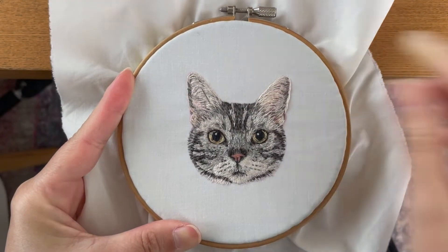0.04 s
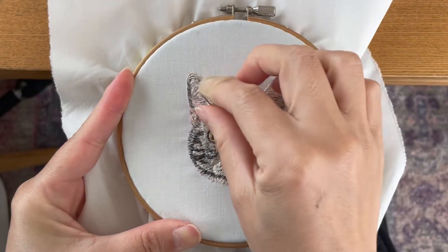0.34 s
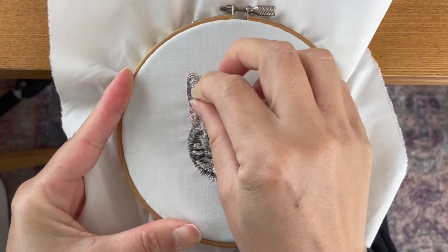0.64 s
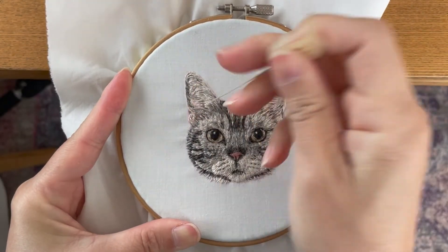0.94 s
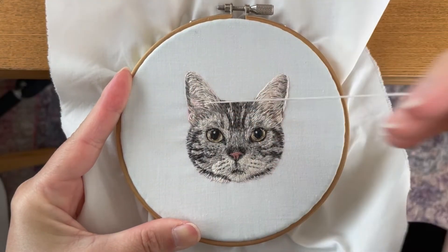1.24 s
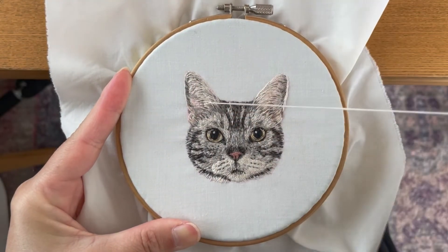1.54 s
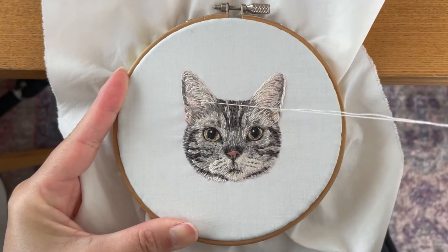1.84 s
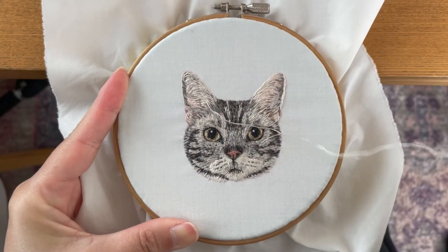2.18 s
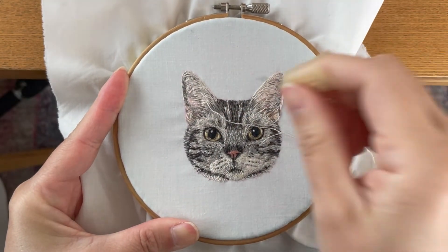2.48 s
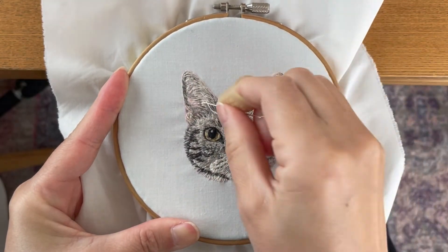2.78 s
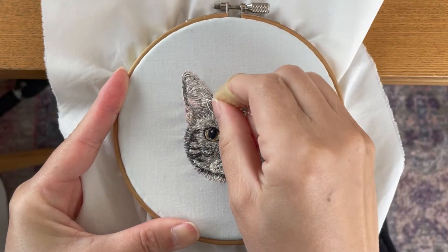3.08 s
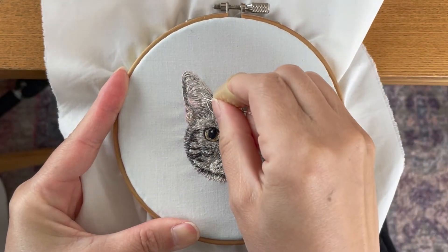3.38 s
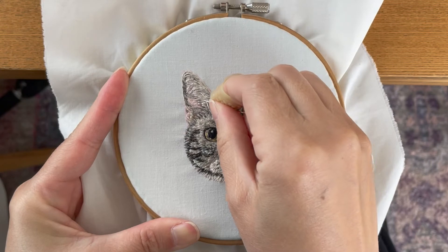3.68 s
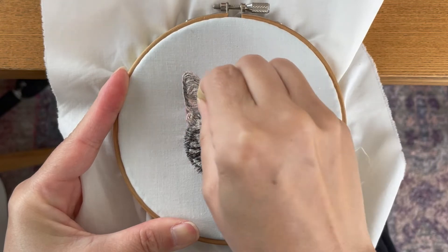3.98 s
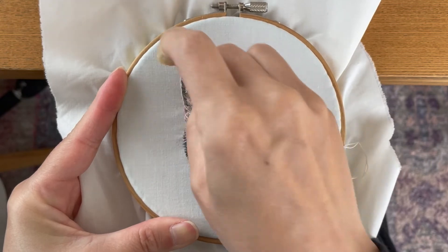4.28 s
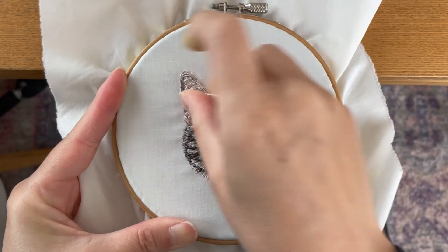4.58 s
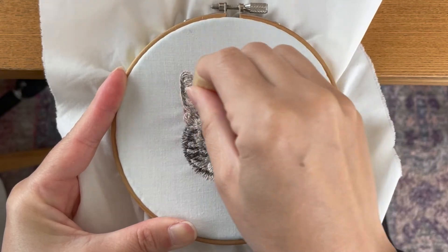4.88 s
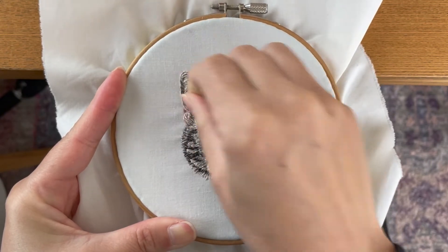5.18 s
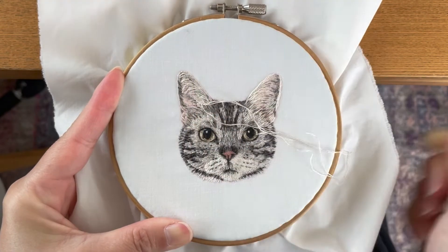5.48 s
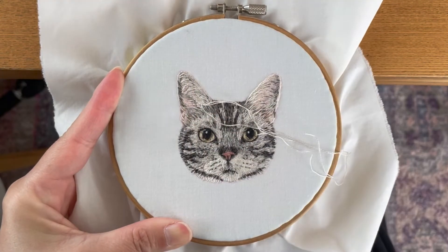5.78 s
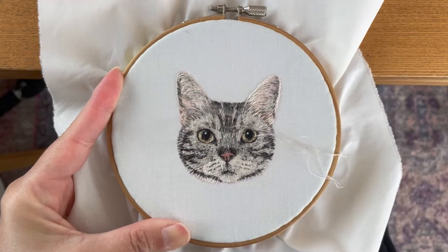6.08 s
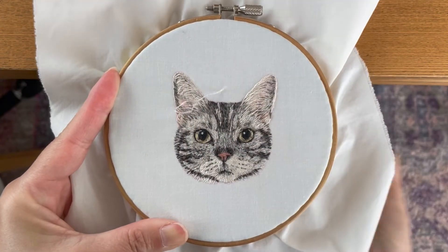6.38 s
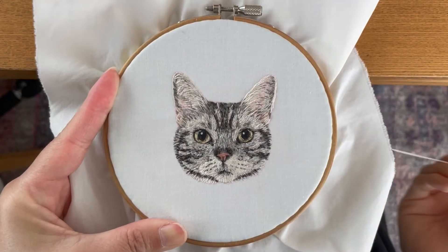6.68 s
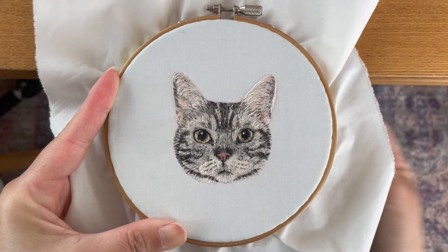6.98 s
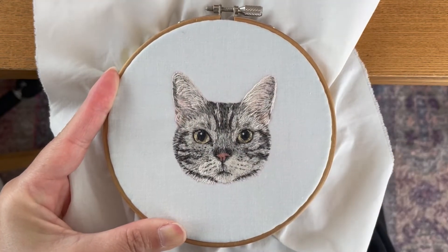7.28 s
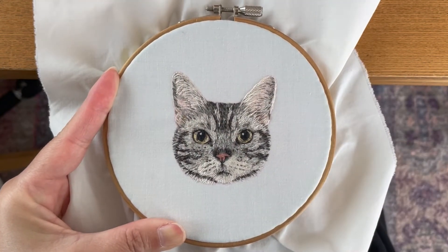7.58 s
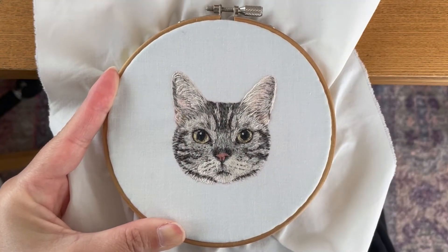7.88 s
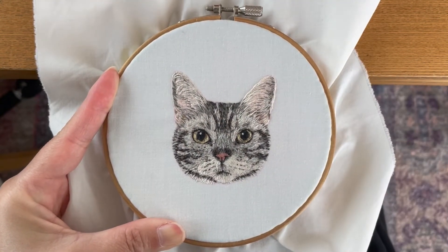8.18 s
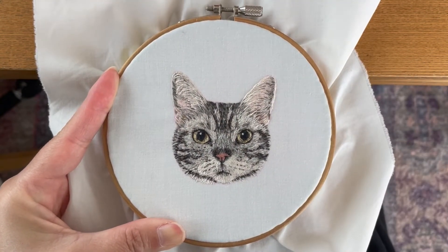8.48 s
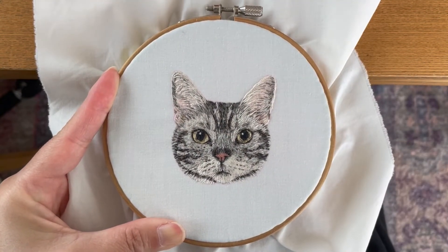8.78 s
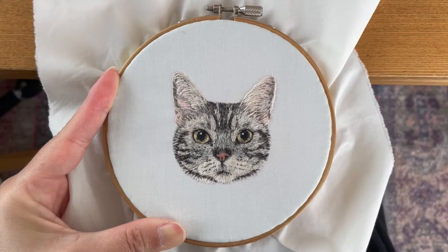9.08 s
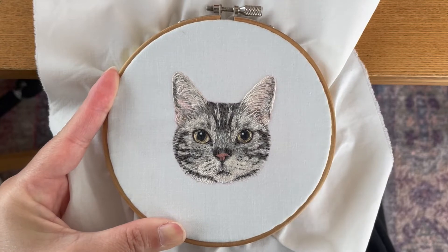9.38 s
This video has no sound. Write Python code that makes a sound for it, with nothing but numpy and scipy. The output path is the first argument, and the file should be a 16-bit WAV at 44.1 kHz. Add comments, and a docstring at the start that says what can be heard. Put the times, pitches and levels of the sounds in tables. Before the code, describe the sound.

Fingers brush cloth stretched tight in an embroidery hoop, then a needle pops through with a small drum-like thump. Thread is drawn after it with a soft rasp that makes the cloth hum. Faint scrapes, ticks and knocks follow as the needle feels for its place. A second pop brings a shorter, softer pull, then scattered light taps. Heard very close in a quiet room.

```python
"""A quiet room, close to an embroidery hoop with cloth stretched drum-tight.
The needle feels for its place, scraping and knocking, and pops through twice (up, then down);
the cloth springs back like a drumhead. Each time the thread is drawn after it with a rasp that sets
the cloth humming. Fingers brush and nudge the cloth; needle tip and nail snap on single threads.
Short reflections and the murmur of the building lie behind."""
import sys
import numpy as np
from scipy import signal
from scipy.fft import rfft, irfft, next_fast_len
from scipy.io import wavfile
from scipy.ndimage import map_coordinates

SR = 44100
rng = np.random.default_rng(int(sys.argv[2]) if len(sys.argv) > 2 else 0)


def persist_wave(psi):
    """Save psi, clipped to +-1, as 16-bit WAV."""
    counts = np.round(np.clip(psi, -1, 1) * 32767).astype(np.int16)
    wavfile.write(sys.argv[1], SR, np.atleast_2d(counts).T)


N = 416744
SHORT, LONG = 32768, 65536   # event buffers, samples

# Needle bursting through: start_s, level_db, lowest_hz, thump_db, contact_hz, ring_share,
# body_hz, body_db, dull_hz, dull_db
NEEDLE_POPS = [(0.7985, -3, 70.9, 0.5, 4562, 0.51, 400, 3.5, 5200, -11),
               (6.0472, -7, 55.6, 4, 5905, 0.86, 446, 4.5, 6395, -7)]
# Wave of a pop: freq_hz, level_db
POP_SPECTRUM = [(25, -28), (42, -12), (58, 0), (115, -1.5), (155, -10), (195, -6), (255, -16), (330, -12),
                (410, -8.5), (500, -10.5), (600, -12), (740, -19), (900, -17.5), (1300, -23), (1650, -19),
                (4500, -33), (8000, -41), (15000, -42)]
# Taut cloth, modes above the lowest: freq_hz, width_hz, level_db
CLOTH_MODES = [(127.35, 16, -1.5), (138, 26, -1.5), (184, 9.5, 6.5), (218, 19, -7), (299.2, 16, 2.5),
               (351, 16, 5), (401, 20, 2), (509.3, 30, -5), (550, 28, -7), (653.4, 22.84, -4),
               (957, 60, -3.5), (1230, 32, -7), (1750, 75, -3.5), (2662, 310, -4.5), (3540, 170, -5),
               (4060, 700, -3), (4920, 190, -6.5), (6800, 119.5, -1), (7401, 380, -5)]

# Thread drawn through the weave: start_s, slow_s, stop_s, rise_db, rasp_db, drone_db, hum_db
THREAD_PULLS = [(0.811, 1.454, 1.743, 7, -52.5, -46.5, -32.5),
                (6.06, 6.536, 6.65, 0.5, -57.5, -51.5, -42.5)]
# Unevenness of the arm: centre_s, half_length_s, drone_and_hum_db, rasp_db
ARM_SURGES = [(0.955, 0.033, -2.5, -4.5), (1.08, 0.028, -3, -1.5), (1.23, 0.014, 2.5, 0.5),
              (1.283, 0.029, -3, 0), (1.422, 0.031, 3, -1.5), (1.526, 0.0095, -3, -4),
              (1.605, 0.027, -3.5, -1.5), (1.681, 0.065, 2, 5), (6.215, 0.012, -7, -4),
              (6.375, .012, -2, -1), (6.46, 0.011, 3, -0.5), (6.572, 0.029, 1.5, -7)]
# Hollow rasp of cloth and taut thread, one list per pull: freq_hz, width_hz, level_db
RASP_MODES = [
    [(1010, 40, 0), (1248, 120, 5.5), (1487, 100, -3.5), (1800, 330, 1), (2320, 240, 0), (2720, 430, 0),
     (3529, 600, -4.5), (4215, 440, -2), (5300, 140, -6.5), (5560, 120, -7), (6200, 350, -11.5),
     (6770, 280, -2), (7350, 450, -4.5), (8014, 700, -7.5), (15200, 1000, -21)],
    [(1020, 60, 0.5), (1200, 200, -1), (1810, 390, -0.5), (2360, 90, -2.5), (2600, 210, -4),
     (3610, 340, -3.5), (4170, 520, -2), (4860, 230, -6.5), (5430, 260, -7.5), (6350, 415, -9.5),
     (7250, 530, -7), (8430, 240, -8), (15200, 1200, -10)],
]
# Middle cloth modes, one list per pull: freq_hz, width_hz, level_db
DRONE_MODES = [
    [(310, 29, -1.5), (360, 31, 0), (463, 100, -8.5), (584, 39, -9.5), (677, 90, -12), (810, 51, -17),
     (877, 62, -17)],
    [(283, 37, -1.5), (341.4, 18, 2), (410, 120, -14), (540, 95, -9), (657, 96, -14), (840, 70, -18)],
]
# Drum-like low cloth modes, one list per pull: freq_hz, width_hz, level_db
HUM_MODES = [
    [(58, 16, 1.5), (133.4, 41, -9.5), (181, 31, -7), (233, 13, -19.5)],
    [(53.5, 21, -2), (123, 86, -9.5), (168.7, 27, -10)],
]

# Point or nail dragging over stitches: peak_s, rise_s, fall_s, scratch_hz, scratch_db, ring_hz, ring_db
POINT_SCRAPES = [(.29, 0.05, 0.039, 1076, -53, 644, -65), (.603, 0.015, 0.16, 1840, -62.5, 403, -76),
                 (.745, 0.067, 0.043, 1810, -59, 400, -42.5), (2.312, 0.04, 0.08, 1870, -71, 354, -76),
                 (2.43, .05, .08, 2194, -70, 354, -75.5), (2.62, .05, .04, 2100, -74, 380, -68),
                 (4.095, .025, 0.045, 4080, -57.5, 399, -47.5), (4.6, .1, 0.074, 3940, -71, 400, -74),
                 (3.632, 0.022, 0.034, 986, -74, 444, -57.5), (3.695, 0.012, 0.044, 960, -72, 440, -54.5),
                 (3.815, 0.068, 0.039, 1940, -80, 482, -73), (3.858, 0.023, 0.079, 1810, -64, 507, -53.5),
                 (4.35, 0.085, 0.072, 1870, -67.5, 523, -58), (4.39, 0.029, 0.069, 1900, -81, 610, -52.5),
                 (4.541, 0.041, 0.066, 1580, -73, 378, -67), (4.598, 0.052, 0.09, 1920, -69, 306, -62),
                 (5.0, 0.056, .08, 1930, -68, 434, -58), (5.033, 0.022, 0.05, 1850, -66, 567, -52.5),
                 (5.16, 0.027, 0.034, 1960, -68, 406, -60), (5.224, 0.016, 0.013, 1470, -60.5, 460, -60),
                 (5.66, 0.078, 0.1, 1930, -78.5, 443, -68.5), (5.8, 0.063, 0.067, 2650, -57.5, 398, -60),
                 (5.93, 0.055, 0.13, 2730, -59, 204, -64), (6.72, 0.062, 0.051, 1902, -87.5, 427, -60.5),
                 (6.545, .012, 0.037, 1156, -69.5, 636, -65), (7.251, 0.02, 0.04, 2698, -57.5, 430, -65.5),
                 (1.79, 0.043, 0.041, 952, -74, 424, -58.5), (7.69, 0.027, .06, 2500, -67, 390, -52.5),
                 (8.283, .012, 0.025, 2460, -61, 430, -51), (8.775, .025, .035, 1190, -65, 559, -73.5),
                 (2.88, .1, 0.076, 765, -75.5, 399, -76.5), (3.08, .08, .08, 784, -79, 372, -71),
                 (3.42, .06, 0.084, 780, -77.5, 400, -71)]
# Point landing without piercing: start_s, level_db, ring_hz, needle_db
POINT_KNOCKS = [(.225, -45.5, 650, 0), (3.677, -50, 465, 1), (3.844, -34, 527, 4), (4.377, -34, 476, -12),
                (5.017, -44, 590, -15), (6.394, -42.5, 637, -18), (6.542, -39.5, 602, -7)]
# Ring of the needle: pitch_ratio, width_ratio, level_db
NEEDLE_MODES = [(.55, .06, -9), (1, .16, -0.5)]
# Ring of the cloth under the point: pitch_ratio, width_ratio, level_db
POINT_MODES = [(.72, .14, -7), (1, .13, 2), (1.3, .16, -14.5)]

# Fingers and needle meeting the cloth: time_s, level_db, lowest_hz, contact_hz, slide_s, spot_hz, spot_db
CLOTH_TOUCHES = [(0.243, -38.5, 168, 754, 0.019, 184, 8), (.700, -39, 159, 507, 0.038, 240, 1),
                 (0.7635, -15, 124, 795, 0.0043, 255, 5), (1.564, -32.5, 62.2, 120.9, 0.035, 130, -3),
                 (1.79, -46.5, 128, 445, .015, 220, 8), (2.497, -55, 299, 601, 0.0018, 349.8, 13),
                 (3.03, -57.5, 304.4, 449.4, 0.022, 352, 6), (3.689, -45.5, 122, 301, .02, 160, 0.5),
                 (3.842, -26, 137, 1010, 0.0042, 221.6, 6), (3.895, -42.5, 111, 400, 0.013, 150, 3),
                 (4.087, -25.5, 83, 478, 0.014, 157, 0), (4.196, -42.5, 68, 177, 0.016, 120, 5.5),
                 (4.377, -27, 121.3, 520, 0.0065, 203, 8.5), (4.545, -34, 62.3, 169.3, 0.12, 79.6, 0),
                 (4.725, -34, 99, 168, 0.03, 180, 5), (5.032, -33.5, 138.3, 342, 0.017, 208.6, 2),
                 (5.186, -41, 67.8, 255.5, 0.052, 160, 7.5), (5.765, -31, 76, 238, 0.018, 105, 8),
                 (5.818, -28.5, 70.6, 200, 0.026, 187, 8.5), (5.995, -36, 326, 555, 0.013, 480, 10.5),
                 (6.009, -25.5, 75.4, 179, 0.019, 129, -1.5), (6.681, -38.5, 62, 264.5, 0.044, 300, 7.5),
                 (7.245, -37, 108.1, 399.4, 0.0034, 160, 8), (7.26, -30, 90, 160.7, 0.0042, 109.8, 4),
                 (7.667, -32, 109.4, 518, 0.0083, 170, 4.5), (7.692, -31.5, 50.5, 189.4, 0.0045, 55.7, 0),
                 (7.735, -42.5, 150.5, 200, 0.0073, 171.3, 7), (7.761, -32, 107.4, 190, 0.0048, 120, 5.5),
                 (7.776, -28.5, 78.1, 140, 0.0086, 82.9, 5), (8.209, -31, 116, 1510, 0.0034, 65.5, 7),
                 (8.218, -41, 177, 300, 0.023, 130, -2), (8.283, -36, 61.1, 600, 0.015, 105, 7.5),
                 (8.371, -42.5, 80.1, 163.5, 0.035, 114.7, 1), (8.778, -45.5, 117.5, 500, 0.016, 68.4, 12),
                 (9.121, -42.5, 60.3, 100.9, 0.009, 69.9, 4.5), (9.362, -23, 51.56, 380, 0.002, 330.5, 1),
                 (9.368, -25, 137, 202, 0.0042, 154, 3)]
# Wave of a touch: freq_hz, level_db
TOUCH_SPECTRUM = [(50, 8.5), (110, -2), (200, -8), (280, -14.5), (420, -9), (600, -13.5), (800, -19.5),
                  (1300, -17.5), (1800, -18.5), (4000, -33), (7000, -45), (15000, -52.5)]
# Tip or nail catching single threads: start_s, level_db, snap_hz, scuff_s
THREAD_TICKS = [(0.227, -51, 1100, 0.014), (2.3109, -42.5, 3970, 0.00077), (2.3974, -48.5, 2205, 0.0018),
                (3.676, -59.5, 1900, 0.0045), (3.843, -44, 1707, 0.0047), (4.057, -48, 5260, 0.031),
                (4.372, -52.5, 1800, 0.0034), (5.0677, -53.5, 6000, 0.0054), (5.1842, -40.5, 4500, .005),
                (5.747, -47, 2300, .012), (6.974, -58.5, 6350, 0.0039), (7.665, -38, 2107, 0.0028),
                (7.7064, -50, 2195, 0.0025), (8.208, -39, 1400, 0.0046), (8.2605, -38.5, 2550, 0.0026),
                (8.283, -58.5, 2322, 0.0074), (9.3572, -40, 2470, 0.0033)]
# Thread letting go: freq_hz, level_db
TICK_SPECTRUM = [(700, -23), (1500, -8.5), (2700, -5), (4500, -10.5), (7000, -10), (11000, -15.5),
                 (15500, -12.5)]
# Skin sliding over cloth: peak_s, rise_s, fall_s, skin_db, cloth_db, tilt_db_per_octave
FINGER_STROKES = [(0.089, 0.074, 0.12, -71.5, -74, 0.5), (0.29, 0.063, 0.071, -51, -51, -1),
                  (0.478, 0.042, 0.086, -67.5, -65, -6.5), (0.688, 0.097, 0.073, -54.5, -58.5, -1.5),
                  (0.769, 0.038, 0.071, -47, -32.5, 2), (2.31, 0.08, 0.15, -64.5, -70, 1.5),
                  (2.44, 0.091, 0.15, -64, -69.5, -2), (2.625, 0.084, 0.041, -66.5, -67, -1.5),
                  (3.843, 0.14, 0.13, -65, -63, -2.5), (4.114, 0.065, 0.042, -48.5, -45, -1.5),
                  (4.38, 0.12, 0.07, -65.5, -56, -1.5), (4.52, 0.06, 0.15, -61.5, -61, 0.5),
                  (4.599, 0.096, 0.093, -61, -61, 2), (5.03, 0.2, 0.12, -72, -65.5, 2),
                  (5.18, 0.059, 0.049, -60.5, -71.5, 2.5), (5.222, 0.049, 0.057, -57, -57, -3.5),
                  (5.409, 0.1, 0.094, -70.5, -66.5, -5.5), (5.702, 0.19, 0.3, -65.5, -62, 0),
                  (5.762, 0.027, 0.071, -52, -53.5, 1.5), (5.802, 0.047, 0.11, -52.5, -49.5, -0.5),
                  (5.904, 0.032, 0.094, -55, -67, 1), (5.98, 0.1, 0.29, -53.5, -57.5, 0.5),
                  (6.123, 0.052, 0.043, -55, -55, 1), (7.246, 0.021, 0.045, -57.5, -57, -4.5),
                  (7.674, .018, 0.038, -57.5, -49, -2.5), (8.261, 0.018, 0.018, -55, -43.5, -10),
                  (8.368, 0.037, 0.036, -67.5, -62.5, -10.5), (8.789, 0.046, 0.062, -67, -63.5, -5),
                  (9.16, 0.063, 0.037, -71, -70.5, -8.5), (9.356, 0.023, 0.024, -58.5, -56.5, -1.5)]
# Hiss of skin: freq_hz, level_db
SKIN_SPECTRUM = [(500, -30.5), (1300, -3.5), (1950, -2), (2300, -1), (2750, 1.5), (3500, -2.5),
                 (6500, -0.5), (9000, -7.5), (12500, -19.5), (15500, -12.5)]
# Cloth under a sliding finger: freq_hz, level_db
PRESS_SPECTRUM = [(50, -11.5), (170, 5), (280, 1.5), (550, 0.5), (780, -7), (1050, -5), (1600, -10),
                  (3000, -28.5)]
# Bands the cloth radiates badly under a hand: freq_hz, width_hz, gain_db
HAND_DIPS = [(740, 50, -4), (1330, 42, -1.5), (3040, 220, -1.5)]

# Two microphone ports, left against right: freq_hz, lead_rad, balance_db
PORT_RESPONSE = [(60, 0, 0), (200, -.06, 0), (400, -.27, -1), (700, -.8, -2.5), (1200, -.1, -2.8),
                 (2000, .12, -2.6), (3100, 1.35, -2), (3600, .4, -1), (4700, .25, -.3), (6300, 1.5, 0),
                 (8300, 2.2, 0), (10000, 2.8, 0), (13000, 3.4, 0), (16000, 3.9, 0)]
# Colour of the reflections: freq_hz, gain_db
ECHO_SPECTRUM = [(40, -45), (150, -25), (380, -4.5), (800, -1), (2000, -8.5), (5000, -9), (9000, -23.5),
                 (15000, -19)]
# Murmur of the building: freq_hz, level_db
MURMUR_SPECTRUM = [(20, -16), (38, -4), (54, 9.5), (80, 0.5), (150, -6), (260, -8.5), (380, -9.5),
                   (560, -22.5), (780, -21), (1200, -26.5), (3000, -58.5)]
# Murmur from the sides: freq_hz, level_db
SIDE_SPECTRUM = [(40, -14), (130, 1), (400, -1.5), (800, -2), (1500, -11), (3000, -17), (5000, -20),
                 (10000, -15.5), (15000, -28)]
# Thin room hiss: freq_hz, level_db
ROOM_HISS_SPECTRUM = [(300, -3.5), (900, -4), (2000, -1.5), (4000, -5.5), (7500, -9.5), (10500, -30),
                      (13500, -34.5), (16000, -34.5)]

FREE_HZ, LOWEST_WIDTH_HZ, LOWEST_DB = 57, 8.5, 8   # lowest mode of the free cloth
SPOT_Q = 7.7   # mode favoured by a contact


def needle_pops(body_q=0.95, dull_width_hz=320):
    """The needle's eye clears the weave; the cloth springs back like a drumhead."""
    out, wave, hz = np.zeros(N), colour(POP_SPECTRUM, SHORT), bins(SHORT)
    for start_s, level_db, lowest_hz, thump_db, contact_hz, ring, *bands in NEEDLE_POPS:
        body_hz, body_db, dull_hz, dull_db = bands
        spot = bell(hz, body_hz, body_hz / body_q, body_db) * bell(hz, dull_hz, dull_width_hz, dull_db)
        thump = bell(hz, lowest_hz, lowest_hz / SPOT_Q, thump_db)
        blow = cloth_blow(lowest_hz, contact_hz, ring, lag_cycles=1.25)
        add(out, start_s, irfft(wave * spot * thump * blow), level_db)
    return out


def cloth_blow(lowest_hz, contact_hz, ring, lag_cycles, knee_hz=45):
    """Air loads the light cloth, so low waves travel slowest: a downward chirp, then a ring."""
    hz = bins(SHORT)
    chirp = np.exp(-2j * np.pi * lag_cycles * np.log(hz + knee_hz))
    low, high = 1j * hz / lowest_hz, 1j * hz / contact_hz
    radiated = low ** 2 / (1 + 0.68 * low + low ** 2) * low / (low + .5)   # weak below the lowest mode
    softness = 1 / (1 + np.sqrt(2) * high + high ** 2)
    return chirp * radiated * softness * cloth(hz, lowest_hz, ring)


def cloth(hz, lowest_hz, ring):
    """First wave plus the modes that build up between the rims."""
    lowest = (lowest_hz, LOWEST_WIDTH_HZ * lowest_hz / FREE_HZ, LOWEST_DB)
    return 1 + ring * mode_sum(hz, [lowest] + CLOTH_MODES)


def thread_pulls():
    """Each pull saws at another point of the weave and plays its own modes."""
    out = np.zeros(N)
    hiss_band = (2200, 5000, -19)   # freq_hz, width_hz, level_db
    for pull, rasp_modes, drone_modes, hum_modes in zip(THREAD_PULLS, RASP_MODES, DRONE_MODES, HUM_MODES):
        fine_slips = friction(per_s=3800, spread_db=-1.5, flutter_db=2, flutter_hz=119, size=LONG)
        coarse_slips = friction(per_s=1200, spread_db=1, flutter_db=2, flutter_hz=40.48, size=LONG)
        hum = rms_one(sum(bowed(*mode) for mode in hum_modes))
        rasp = wandering(ringing(fine_slips, rasp_modes + [hiss_band]), share=.008)
        drone = wandering(ringing(coarse_slips, drone_modes), share=.03)
        start = round(pull[0] * SR)
        out[start:start + LONG] += (pull_gains(*pull) * [rasp, drone, hum]).sum(axis=0)
    return out


def pull_gains(start_s, slow_s, stop_s, rise_db, rasp_db, drone_db, hum_db):
    """The arm speeds up, then brakes; rasp, drone and hum follow its speed."""
    brake_db, grip_s = 20.5, 0.0041
    pop_tail_peak_db, pop_tail_s = 16, 0.097   # low ring of the cloth after the pop, dying away
    t = start_s + np.arange(LONG) / SR
    braking = np.clip((t - slow_s) / (stop_s - slow_s), 0, 2)
    speed_db = np.interp(t, [start_s, slow_s], [-rise_db, 0]) - brake_db * braking ** 1.55
    pop_tail_db = pop_tail_peak_db * np.exp(-(t - start_s) / pop_tail_s)
    grip = np.clip((t - start_s) / grip_s, 0, 1)
    drag_db, grit_db = sum(np.outer(gains_db, np.exp(-((t - centre_s) / half_s) ** 2))
                           for centre_s, half_s, *gains_db in ARM_SURGES)
    return grip * from_db([rasp_db + speed_db + grit_db,
                           drone_db + speed_db + drag_db + .4 * pop_tail_db,
                           hum_db + 0.92 * speed_db + drag_db + pop_tail_db])


def bowed(freq_hz, width_hz, level_db, steadiness=.5):
    """An even pull feeds a mode steadily, like a bow."""
    tone = signal.hilbert(ringing(rng.standard_normal(LONG), [(freq_hz, width_hz, level_db)]))
    return from_db(level_db) * rms_one(tone.real / (np.abs(tone) + 0.14) ** steadiness)


def needle_scrapes():
    """The point skips from thread to thread, sounds hollow and rings the cloth under it."""
    out = np.zeros(N)
    for peak_s, rise_s, fall_s, scratch_hz, scratch_db, ring_hz, ring_db in POINT_SCRAPES:
        slips = friction(per_s=1700, spread_db=2, flutter_db=3, flutter_hz=102.16, size=SHORT)
        scratch = wandering(ringing(slips, pitched(NEEDLE_MODES, scratch_hz)), share=.035)
        ring = ringing(slips, pitched(POINT_MODES, ring_hz))
        add_swell(out, peak_s, rise_s, fall_s, scratch, scratch_db)
        add_swell(out, peak_s, rise_s, fall_s, ring, ring_db)
    return out


def needle_knocks(needle_hz=1680, cushion_hz=800):
    """The point lands, cushioned by the cloth, skids and leaves a short hollow ring."""
    out, hz = np.zeros(N), bins(SHORT)
    steel = mode_sum(hz, pitched(NEEDLE_MODES, needle_hz))
    cushion = 1 / (1 + 1j * hz / cushion_hz) ** 2
    for start_s, level_db, ring_hz, needle_db in POINT_KNOCKS:
        force = scuffed_impulse(scuff=0.17, decay_s=0.0054)
        ring = mode_sum(hz, pitched(POINT_MODES, ring_hz)) + from_db(needle_db) * steel
        add(out, start_s, irfft(rfft(force) * ring * cushion), level_db)
    return out


def finger_touches(drag_ratio=3.98, lead_s=.1):
    """A fingertip drags a little as it lands, longer as it leaves; holding raises the lowest mode."""
    out, wave = np.zeros(N), colour(TOUCH_SPECTRUM, SHORT)
    t = np.arange(SHORT) / SR - lead_s
    for time_s, level_db, lowest_hz, contact_hz, slide_s, spot_hz, spot_db in CLOTH_TOUCHES:
        drag = rng.standard_normal(SHORT) * np.exp(-np.maximum(t, -2 * t) / slide_s)
        force = drag_ratio * drag / np.linalg.norm(drag)
        force[round(lead_s * SR)] += 1
        spot = bell(bins(SHORT), spot_hz, spot_hz / SPOT_Q, spot_db)
        blow = cloth_blow(lowest_hz, contact_hz, ring=0.85, lag_cycles=.8)
        add(out, time_s - lead_s, irfft(rfft(force) * wave * spot * blow), level_db)
    return out


def thread_ticks(gain_db=3.5, snap_db=14, snap_q=1.9):
    """A caught thread lets go with a snap and a short scuff."""
    out, hz = np.zeros(N), bins(SHORT)
    response = colour(TICK_SPECTRUM, SHORT) * cloth(hz, FREE_HZ, ring=0.72)
    for start_s, level_db, snap_hz, scuff_s in THREAD_TICKS:
        force = scuffed_impulse(scuff=.27, decay_s=scuff_s)
        snap = 1 + from_db(snap_db) * resonance(hz, snap_hz, snap_hz / snap_q)
        add(out, start_s, irfft(rfft(force) * response * snap), level_db + gain_db)
    return out


def finger_strokes(skin_gain_db=1, scratch_db=-2, pivot_hz=3000):
    """Skin hisses over the stitches with a hollow scratch and stirs the half-damped cloth."""
    out, hz = np.zeros(N), bins(N)
    scratch = 1 + from_db(scratch_db) * resonance(hz, centre_hz=1950, width_hz=300)
    fine_slips = friction(per_s=6000, spread_db=-1, flutter_db=2, flutter_hz=151)
    coarse_slips = friction(per_s=1500, spread_db=2.5, flutter_db=3.5, flutter_hz=91)
    hiss = shaped(fine_slips, scratch * colour(SKIN_SPECTRUM, N) * cloth(hz, FREE_HZ, ring=0.37))
    press = shaped(coarse_slips, colour(PRESS_SPECTRUM, N) * cloth(hz, FREE_HZ, ring=0.5404))
    octaves = np.clip(np.log2(bins(LONG) / pivot_hz), -2, 2)
    for peak_s, rise_s, fall_s, skin_db, cloth_db, tilt_db_per_octave in FINGER_STROKES:
        piece = (round(peak_s * SR) + np.arange(LONG)) % N
        skin = irfft(rfft(hiss[piece]) * from_db(tilt_db_per_octave * octaves))
        add_swell(out, peak_s, rise_s, fall_s, skin, skin_gain_db + skin_db)
        add_swell(out, peak_s, rise_s, fall_s, press[piece], cloth_db)
    return out


def under_hand(x):
    """Cloth under a hand radiates some bands badly: a hollow colour."""
    hz = bins(N)
    return filtered(x, np.prod([bell(hz, *dip) for dip in HAND_DIPS], axis=0))


def ports(x):
    """Near sound reaches the two ports out of step, almost opposed in the treble."""
    hz = bins(N)
    lead_rad, balance_db = at_hz(PORT_RESPONSE, hz), at_hz(PORT_RESPONSE, hz, column=2)
    left = from_db(balance_db / 2) * np.exp(.5j * lead_rad)
    return filtered(x, np.array([left, 1 / left]))


def reflections(x, room_t60_s=0.13, near_t60_s=0.02, near_ratio=5.5, gap_s=0.0016, gain_db=-2):
    """Table and hands reflect at once; the furnished room adds a short, dull stereo tail."""
    t = np.arange(SHORT) / SR
    decay = (from_db(-60 * t / room_t60_s) + near_ratio * from_db(-60 * t / near_t60_s)) * (t > gap_s)
    scatter = rng.standard_normal((2, SHORT)) * decay / np.linalg.norm(decay)
    tail = irfft(rfft(scatter) * colour(ECHO_SPECTRUM, SHORT))
    return from_db(gain_db) * signal.fftconvolve([x], tail, axes=1)[:, :N]


def room_tone(murmur_db=-65, hiss_db=-77, side_db=-81):
    """Low murmur of the building, partly from the sides, and a thin hiss."""
    centre, common, left, right, across = rng.standard_normal((5, N))
    murmur = from_db(murmur_db) * shaped(centre, colour(MURMUR_SPECTRUM, N))
    hiss = from_db(hiss_db) * shaped(0.61 * common + np.array([left, right]), colour(ROOM_HISS_SPECTRUM, N))
    side = from_db(side_db) * shaped(across, colour(SIDE_SPECTRUM, N))
    return murmur + hiss + np.array([side, -side])


def friction(per_s, spread_db, flutter_db, flutter_hz, size=N):
    """Fibres catch and slip at random, in small clumps."""
    steps = np.arange(size)
    slips = (rng.random(size) < per_s / SR) * rng.standard_normal(size)
    sizes = from_db(spread_db * np.clip(rng.standard_normal(size), -2, 2))
    clumps = np.interp(steps * flutter_hz / SR, steps, rng.standard_normal(size))
    return slips * sizes * from_db(flutter_db * clumps)


def scuffed_impulse(scuff, decay_s):
    """Unit impulse, then decaying noise."""
    force = scuff * rng.standard_normal(SHORT) * np.exp(-np.arange(SHORT) / (SR * decay_s))
    force[0] = 1
    return force


def wandering(x, share, per_s=14):
    """The contact point shifts; resonances drift by a share of their pitch."""
    steps = np.arange(len(x))
    drift = np.interp(steps * per_s / SR, steps, rng.standard_normal(len(x)))
    return map_coordinates(x, [np.cumsum(1 + share * drift)], order=3, mode="mirror")


def ringing(slips, modes):
    """Friction through resonances with deep valleys between; rms 1."""
    hz = bins(len(slips))
    power = sum(from_db(db) ** 2 * np.abs(resonance(hz, f, width)) ** 4 for f, width, db in modes)
    return rms_one(irfft(rfft(slips) * np.sqrt(power)))


def resonance(hz, centre_hz, width_hz):
    """One damped mode, peak gain 1."""
    return 1 / (1 + 1j * (hz ** 2 - centre_hz ** 2) / (hz * width_hz))


def mode_sum(hz, modes):
    """Response of modes in parallel."""
    return sum(from_db(db) * resonance(hz, freq_hz, width_hz) for freq_hz, width_hz, db in modes)


def pitched(modes, pitch_hz):
    """Mode ratios to Hz."""
    return [(ratio * pitch_hz, width_ratio * pitch_hz, db) for ratio, width_ratio, db in modes]


def bell(hz, centre_hz, width_hz, db):
    """Boost or cut one band."""
    lift = 1 + (from_db(abs(db)) - 1) * resonance(hz, centre_hz, width_hz)
    return lift if db > 0 else 1 / lift


def colour(points, size):
    """Minimum-phase response with the given spectrum."""
    cepstrum = irfft(np.log(from_db(at_hz(points, bins(size)))))
    half = len(cepstrum) // 2
    cepstrum[1:half] *= 2
    cepstrum[half + 1:] = 0
    return np.exp(rfft(cepstrum))


def filtered(x, response):
    """Filter a full-length signal."""
    return irfft(rfft(x, padded(N)) * response)[..., :N]


def shaped(x, response):
    """Filter, then scale to rms 1."""
    return rms_one(filtered(x, response))


def add(track, start_s, sound, peak_db):
    """Mix in a sound at its time and peak level."""
    start = round(start_s * SR)
    part = sound[:N - start]
    track[start:start + len(part)] += from_db(peak_db) * part / np.abs(sound).max()


def add_swell(track, peak_s, rise_s, fall_s, sound, level_db, depth_db=17.5):
    """Mix in a steady sound under a rounded arch, depth_db down at rise_s before and fall_s after."""
    start = max(0, int((peak_s - 2 * rise_s) * SR))
    stop = min(N, start + len(sound), int((peak_s + 2 * fall_s) * SR))
    t = np.arange(start, stop) / SR - peak_s
    drop_db = depth_db * np.maximum(-t / rise_s, t / fall_s) ** 1.13
    track[start:stop] += sound[:len(t)] * from_db(level_db - drop_db)


def at_hz(points, hz, column=1):
    """Interpolate a column over log frequency."""
    table = np.array(points)
    return np.interp(np.log(hz), np.log(table[:, 0]), table[:, column])


def bins(size):
    """FFT frequencies, floored at 1 Hz."""
    return np.maximum(np.fft.rfftfreq(padded(size), 1 / SR), 1)


def padded(size):
    """Fast even FFT length."""
    return 2 * next_fast_len((size + 1) // 2)


def from_db(db):
    """Decibels to gain."""
    return 10 ** (np.asarray(db) / 20)


def rms_one(x):
    """Scale to rms 1."""
    return x / np.sqrt(np.mean(x ** 2) + 1e-20)


def scene():
    """Close handling of the hoop, its reflections and the room."""
    hoop = needle_pops() + thread_pulls() + needle_scrapes() + needle_knocks()
    hoop += under_hand(finger_touches() + thread_ticks() + finger_strokes())
    return ports(hoop) + reflections(hoop) + room_tone()


def record(dry):
    """Subsonic roll-off and a steep top cut."""
    low_cut_hz, high_cut_hz = 4.8, 15850
    lean = signal.sosfilt(signal.butter(2, low_cut_hz, "high", fs=SR, output="sos"), dry)
    return signal.sosfilt(signal.ellip(10, .1, 80, high_cut_hz, fs=SR, output="sos"), lean)


dry = scene()
out = record(dry)
persist_wave(out)
```